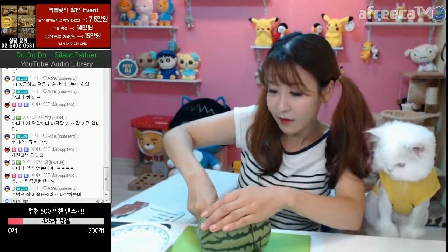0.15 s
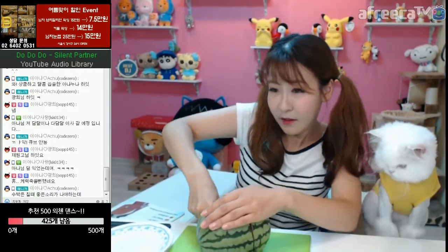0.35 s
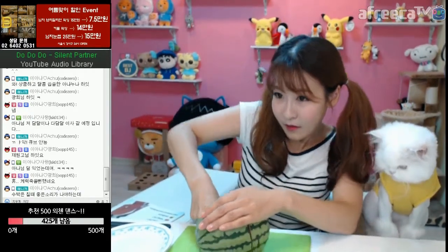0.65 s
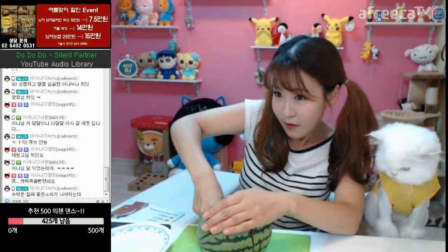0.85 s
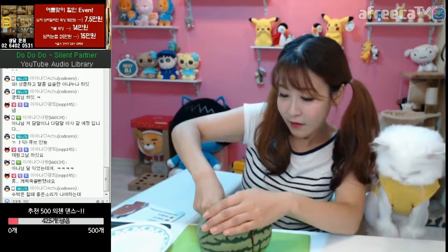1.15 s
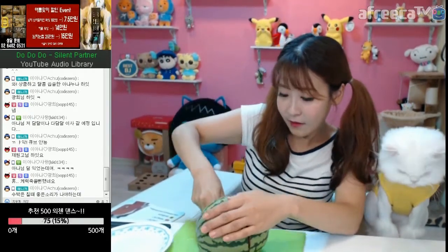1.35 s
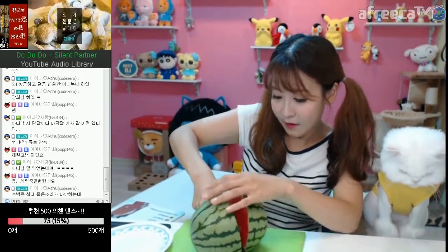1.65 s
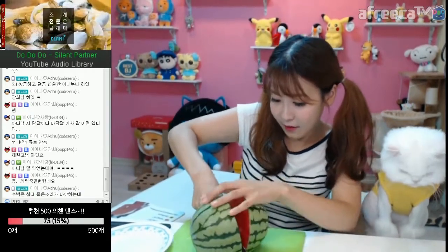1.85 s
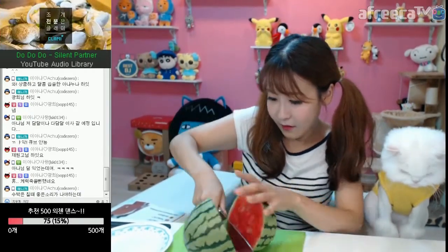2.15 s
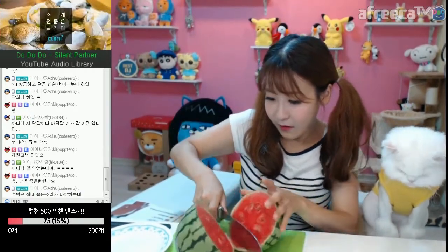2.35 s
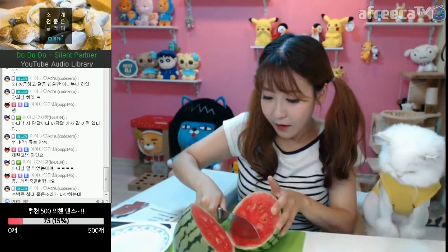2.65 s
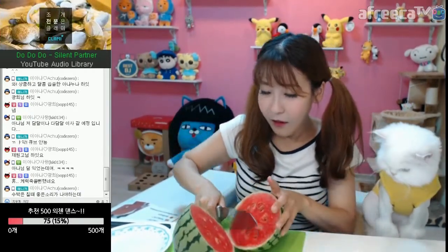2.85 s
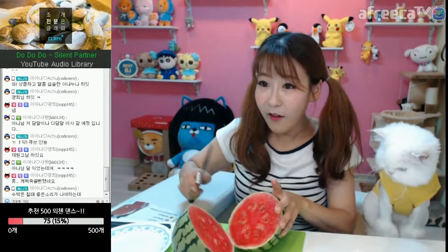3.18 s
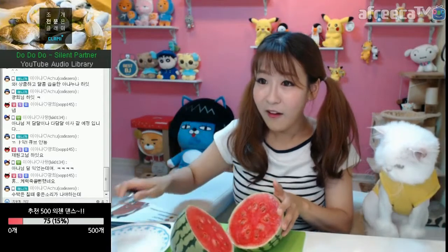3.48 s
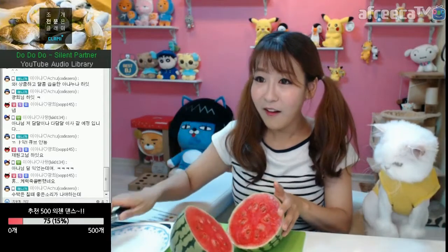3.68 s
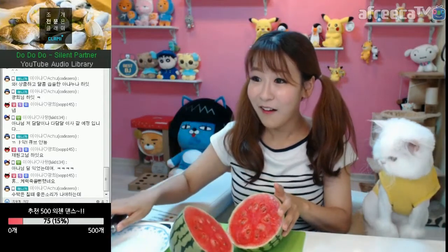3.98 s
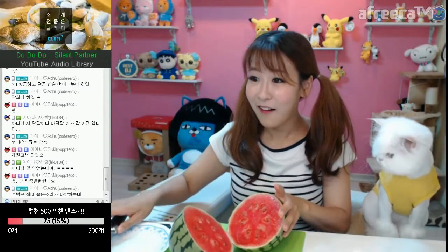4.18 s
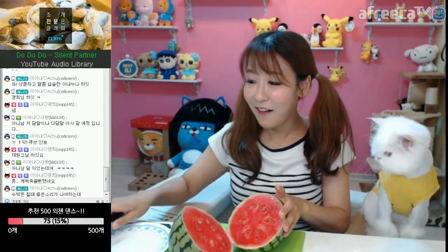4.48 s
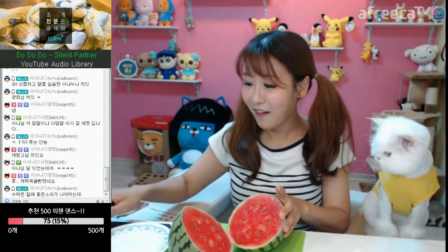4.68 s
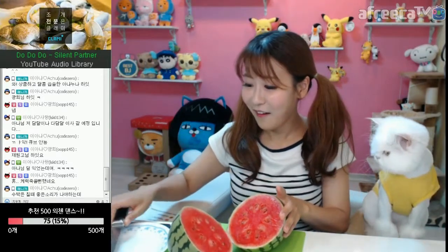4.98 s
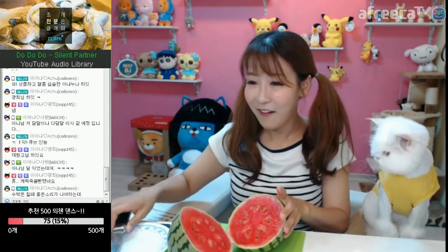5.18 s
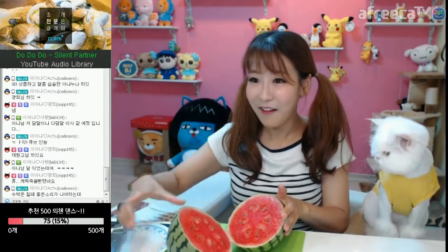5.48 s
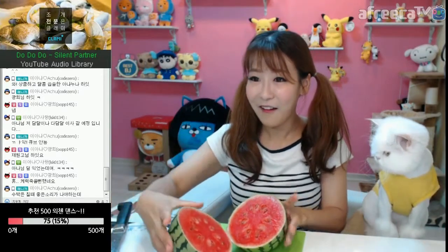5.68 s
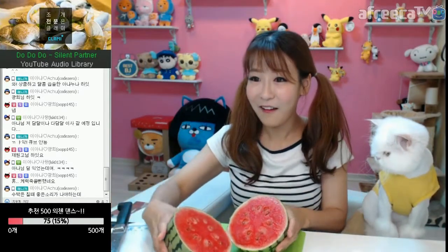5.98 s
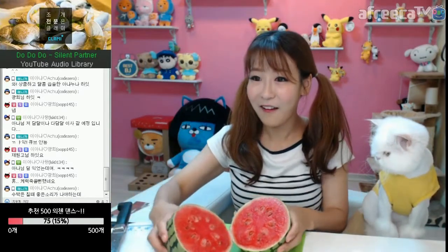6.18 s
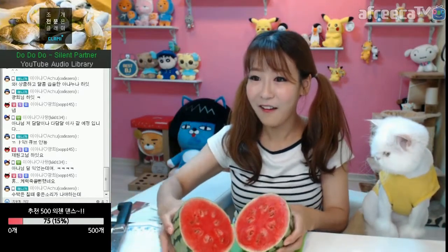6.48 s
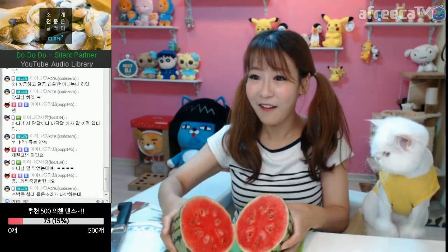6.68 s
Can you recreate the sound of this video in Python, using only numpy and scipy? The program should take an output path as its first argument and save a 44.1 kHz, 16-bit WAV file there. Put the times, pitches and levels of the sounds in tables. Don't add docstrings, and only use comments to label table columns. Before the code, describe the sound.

Nearly mono, close microphone with a short room tail: rapid rind cracks burst into a juicy split, ending in a loud blade thud and a lesser one. Crackly tearing opens the fruit, then near silence over a soft computer fan. Small ceramic taps and a dull handle knock lead to a sharp bouncing metal clatter, soft hand bumps and tiny ticks. Low rumble comes from leaning hands.

```python
import sys
import numpy as np
from scipy import signal
from scipy.io import wavfile

SR = 44100
rng = np.random.default_rng(int(sys.argv[2]) if len(sys.argv) > 2 else 0)


def volts(x):
    e = np.asarray(x, float) / 20
    return 10 ** e


def log_audio(samples):
    frames = np.atleast_2d(samples).T
    limited = np.clip(frames, -1, 1)
    pcm = np.round(limited * 32767).astype(np.int16)
    wavfile.write(sys.argv[1], SR, pcm)


N = 301100
DELAY_S = 0.00083
LEAD = 400

# pitch in Hz, level in dB, time to fall by 60 dB in seconds.
MELON = [(460, 5, 0.035), (580, -3, 0.035), (950, -8, .012), (1220, -5, 0.02), (1750, -10, 0.01),
         (341.6, -15.5, .04)]


def rms_one(x):
    return x / np.sqrt(np.mean(x ** 2) + 1e-20)


def peak_one(x):
    return x / np.abs(x).max()


def band(x, low_hz, high_hz, order=2):
    sos = signal.butter(order, [low_hz, min(high_hz, SR / 2.2)], "band", fs=SR, output="sos")
    return signal.sosfilt(sos, x)


def swell(s, hold_s, rise_db_per_s, fall_db_per_s):
    end = s + hold_s
    times = [s - 90 / rise_db_per_s, s, end, end + 90 / fall_db_per_s]
    db = np.interp(np.arange(0, N, 20) / SR, times, [-90, 0, 0, -90])
    return volts(db).repeat(20)[:N]


def ring(clicks, hz, t60):
    r, w = volts(-60 / (t60 * SR)), 2 * np.pi * hz / SR
    return signal.lfilter([0, np.sin(w)], [1, -2 * r * np.cos(w), r * r], clicks + 1e-18)


def struck(s, db, modes, spread_db):
    out, at = np.zeros(N), np.round(np.asarray(s) * SR).astype(int)
    for hz, mode_db, t60 in modes:
        luck = rng.standard_normal(len(at))
        clicks = np.zeros(N)
        clicks[at] = volts(db + mode_db + spread_db * luck)
        out += ring(clicks, hz, t60)
    return out


def add(out, s, piece):
    i = round((s + DELAY_S) * SR) - LEAD
    out[i:i + len(piece)] += piece[:N - i]


def burst(t60, size=2048, edge_db=0):
    t = (np.arange(size) - LEAD) / SR
    x = rng.standard_normal(size) * volts(np.where(t < 0, -20 + 2200 * t, -60 * t / t60))
    x[LEAD] = -3.0 * volts(edge_db)
    return x


def coloured(white, spectrum, edges, tilt_db=0):
    hz, db = np.transpose(spectrum)
    centres = np.sqrt(edges[1:] * edges[:-1])
    band_db = np.interp(np.log(centres), np.log(hz), db) + tilt_db * np.log2(centres / 1500)
    out = 0
    for k, gain in enumerate(volts(band_db)):
        out = out + gain * band(white[k % len(white)], edges[k], edges[k + 1])
    return out


def rattles(rows, spectrum, edge_db):
    out, edges = np.zeros(N), 180 * 2 ** np.arange(0, 6, 1 / 3)
    for s, db, tilt_db, t60 in rows:
        shudder = burst(max(t60, .01), size=SR // 3, edge_db=edge_db)
        add(out, s, volts(db) * peak_one(coloured([shudder, -shudder], spectrum, edges, tilt_db)))
    return out


def fan():
    # pitch in Hz, level in dB per Hz.
    air_colour = [(24, -36), (40, -18), (70, 4), (174, -19), (204, -9), (235, -6.5), (411, -10.5),
                  (441, -13), (754, -20), (847, -12), (2590, -25), (9570, -37.5), (10500, -40.5),
                  (13600, -78), (22000, -120)]
    # pitch in Hz, width in Hz, level in dB against the air.
    casing = [(445, 22, -10.5), (840, 50, -10), (997, 86, -14), (1213, 12, -19.5)]
    white = rng.standard_normal((3, N))
    out = rms_one(coloured(white[:2], air_colour, 48 * 2 ** np.arange(0, 8.1, .5)))
    for hz, width_hz, db in casing:
        out += volts(db) * rms_one(band(white[2], hz - width_hz / 2, hz + width_hz / 2, order=1))
    return volts(-65) * out


def shake():
    # start in seconds, hold in seconds, sway in dB, rumble in dB.
    pushes = [(0, 0.06, -45.5, -70.5), (0.238, 0.05, -49.5, -79), (0.544, 0.027, -61, -62),
              (0.698, 0.042, -46.5, -55.5), (.9, 0.015, -50, -45.5), (.98, 0.02, -58, -39),
              (1.104, 0.13, -61, -64), (1.373, 0.025, -61, -50), (1.473, 0.035, -70, -63),
              (1.756, 0.09, -63, -62), (2.015, 0.12, -67, -73), (2.514, 0.03, -81, -63),
              (4.64, 0.03, -88, -55.5), (5.36, 0.054, -90, -47), (5.505, .05, -78, -54.5)]
    rest_sway_db, rest_rumble_db = -87, -73
    s, hold_s, sway_db, rumble_db = np.transpose(pushes)
    lean = np.array([swell(*row, rise_db_per_s=300, fall_db_per_s=128.5) for row in zip(s, hold_s)])
    sway, rumble = rng.standard_normal((2, N))
    sway_gain = volts(rest_sway_db) + volts(sway_db) @ lean
    rumble_gain = volts(rest_rumble_db) + volts(rumble_db - 11.5) @ lean
    return sway_gain * rms_one(band(sway, 6, 15)) + rumble_gain * rms_one(band(rumble, 50, 180))


def booms():
    # start in seconds, deepest pitch in dB, upper pitches in dB.
    blows = [
        (0.579, -61, -42),
        (.64, -39, -63),
        (0.929, -54, -47),
        (1.028, -40.5, -37),
        (1.079, -41.5, -73),
        (1.356, -60, -45),
        (5.35, -39.5, -38.5),
        (5.549, -74, -55),
    ]
    # pitch in Hz, time to fall by 60 dB in seconds.
    table_top = [(89, 0.11), (135, 0.066), (210, 0.077)]
    s, deep_db, upper_db = np.transpose(blows)
    out = np.zeros(N)
    for (hz, t60), db in zip(table_top, [deep_db, upper_db, upper_db]):
        out += struck(s, db, [(hz, 0, t60)], spread_db=0)
    return band(out, 71, 220)


def plate():
    # start in seconds, peak in dB, nearness to the rim from 0 to 1.
    taps = [
        (4.037, -57.5, 0.95),
        (4.409, -42, 0),
        (4.589, -63, 1),
        (5.29, -50.5, 0.8),
    ]
    # pitch in Hz, dB struck inside, dB struck at the rim, time to fall by 60 dB in seconds.
    modes = [(797, 6, -30, .09), (1500, -3, -30, .06), (2223, -1, -12, .2), (3128, -4, -5, .15),
             (4258, 1, -2, .13), (5600, -20, -1, .07), (7090, -16, -2, .06), (8800, -26, -9, .06)]
    # start in seconds, level in dB, pitch in Hz,
    # time to fall by 60 dB in seconds.
    dish = (4.662, -73, 4690, .35)
    out, click = np.zeros(N), np.arange(SR // 3) == LEAD
    for s, db, rim in taps:
        body = 0
        for hz, inside_db, rim_db, t60 in modes:
            body = body + volts(inside_db + rim * (rim_db - inside_db)) * ring(click, hz, t60)
        add(out, s, volts(db) * peak_one(body))
    s, db, hz, t60 = dish
    return out + struck([s], db, [(hz, 0, t60), (1.012 * hz, -3, t60)], spread_db=0)


def handle_knocks():
    # start in seconds, peak in dB, tilt in dB per octave, rattle's 60 dB fall in seconds.
    knocks = [
        (4.408, -45, 0, 0.071),
        (4.635, -36, 0.012, 0.062),
        (4.655, -45, 0, 0.031),
    ]
    # pitch in Hz, level in dB per Hz.
    handle = [(240, -26), (400, -7), (680, 3), (1040, -5), (2160, 1.5), (2340, -4), (3290, -11.5),
              (7230, -16.5), (9750, -26), (10300, -48), (13400, -78), (22000, -120)]
    return rattles(knocks, handle, edge_db=1.0)


def dropped_knife():
    # start in seconds, peak in dB, tilt in dB per octave, rattle's 60 dB fall in seconds.
    landings = [
        (5.3462, -14, -0.5, 0.058),
        (5.352, -17, -4, 0.032),
        (5.359, -14, 3, 0.013),
        (5.365, -23, -1.5, 0.027),
        (5.375, -27.5, 0.5, 0.18),
    ]
    # pitch in Hz, level in dB per Hz.
    clatter = [(120, -30), (200, -15), (638, -35), (791, -25.5), (904, -35.5), (1250, -3.5), (1600, -16),
               (2040, 2.5), (2700, -31.5), (3080, 2), (5150, 0), (7170, 0.5), (8200, -5), (9050, 0),
               (10500, -37), (13600, -67), (22000, -120)]
    # pitch in Hz, level in dB, time to fall by 60 dB in seconds.
    steel = [(800, -8, .12), (1992, -1, .09), (2128, -12, .07), (3090, -6, .07), (3628, -2, .05),
             (3910, -10, .05), (6045, -2, .05), (6360, -2, .06), (6937, -6, .07), (7035, -3, .09),
             (7110, -5, .07), (7240, -7, .07), (7840, -4, .09), (8349, -8, .2), (8775, -8, .1)]
    rows = np.array(landings)
    blade = struck(rows[:, 0] + DELAY_S, rows[:, 1] - 16.5, steel, spread_db=1.5)
    return rattles(landings, clatter, edge_db=-2) + band(blade, 600, 11000)


def thuds():
    # start in seconds, peak in dB, tilt in dB per octave, rattle's 60 dB fall in seconds.
    blows = [
        (1.0255, -15, 2.5, 0.034),
        (1.032, -32, 1, 0.084),
        (1.049, -28, 0.5, 0.088),
        (1.074, -52, 0.3, 0.099),
        (1.3535, -26.5, -0.5, 0.055),
        (1.376, -41, -1, 0.11),
        (5.547, -54.5, -7, 0.094),
        (5.612, -53, -14, 0.12),
    ]
    # pitch in Hz, level in dB per Hz.
    board = [(150, -34), (250, 3.5), (420, 16.5), (620, 7.5), (900, 13.5), (1200, 11), (2000, 4),
             (3200, -1), (4500, -7), (6000, -23.5), (8000, -30.5), (11000, -40)]
    return rattles(blows, board, edge_db=9.0)


def tearing():
    # start in seconds, hold in seconds, level in dB, centre in Hz,
    # hollow body in dB against the level.
    tears = [(0, 0.021, -63.5, 4330, -26), (0.055, .2, -70, 5000, -19), (0.264, 0.16, -62.5, 4800, -11),
             (0.412, 0.071, -43.5, 5000, -11), (0.514, 0.037, -52.5, 4500, -15),
             (0.568, 0.0067, -28.5, 4260, -12), (0.592, 0.015, -29, 4500, -16.5),
             (0.665, 0.063, -49, 4870, -16), (0.773, 0.12, -50, 5360, -14.5),
             (0.858, 0.081, -63, 5300, 1.5), (0.927, 0.022, -54.5, 5300, -2.5),
             (0.966, 0.02, -47, 5400, -14), (1.397, .17, -60.5, 3430, -26),
             (1.793, 0.044, -48.5, 5000, -35), (1.954, .015, -60.5, 5300, -22),
             (2.143, 0.078, -66, 4700, -19), (2.3, 0.1, -51, 5500, -13), (2.383, .02, -41, 5600, -17.5),
             (2.449, 0.065, -50, 5500, -19), (2.54, 0.057, -62, 5470, -23), (2.607, 0.14, -68.5, 5600, -12),
             (2.77, 0.15, -78, 4700, -9.5)]
    present = rng.random(N) < 5000 / SR
    grain_size = volts(3.1 * np.minimum(rng.exponential(1, N), 5))
    grains = present * grain_size * rng.choice([-1, 1], N)
    centres = np.geomspace(2000, 9000, 7)
    parts = np.array([rms_one(band(grains, hz / 1.16, hz * 1.16)) for hz in centres])
    hollow = rms_one(sum(volts(db) * ring(grains, hz, 0.6 * t60) for hz, db, t60 in MELON))
    out = np.zeros(N)
    for s, hold_s, db, centre_hz, hollow_db in tears:
        shares = volts(-7.0 * np.log2(centres / centre_hz) ** 2)
        flesh = shares @ parts / np.sqrt(np.sum(shares ** 2)) + volts(hollow_db) * hollow
        out += volts(db) * swell(s, hold_s, rise_db_per_s=1303, fall_db_per_s=381) * flesh
    return out


def snaps():
    # start in
    # seconds, peak in dB, centre in Hz, hollow body in dB against the peak.
    breaks = [(0.405, -24, 5420, -23), (0.4219, -29, 4960, -23), (0.4339, -26, 5440, -24),
              (0.4424, -29, 4310, -21), (0.4539, -25, 5540, -24), (0.4648, -23, 4800, -24),
              (0.5142, -41, 2540, -19), (0.5412, -37, 4880, -8), (0.5556, -24, 3830, -18),
              (0.5634, -28, 3160, -8), (0.5706, -17, 3190, -14), (0.5906, -20, 5050, -14),
              (0.5999, -20, 3770, -15), (0.6044, -20, 4730, -15), (0.6104, -21, 5520, -22),
              (0.6874, -37, 5070, -20), (0.7706, -46, 5500, -22), (0.825, -42, 5820, -8),
              (0.846, -16, 4700, -27), (0.9093, -21, 5400, -22), (0.9744, -43, 5060, -18),
              (1.1799, -51, 2760, -10),
              (1.3764, -47, 2590, 6), (1.3944, -49, 2850, 1), (1.7823, -44, 3940, -17),
             (1.8347, -37, 5570, -22), (1.8542, -24, 5420, -35), (1.8946, -45, 4620, -20),
             (1.9599, -46, 4470, -18), (1.9714, -37, 4780, -27), (1.9769, -33, 5410, -31),
             (2.0063, -43, 7230, -22), (2.1314, -58, 3980, -7), (2.166, -52, 4640, -14),
             (2.1999, -58, 4610, -7), (2.2847, -25, 5000, -15), (2.3241, -25, 5400, -19),
             (2.3575, -26, 5540, -18), (2.3835, -20, 5000, -22), (2.4514, -45, 3930, -16),
             (2.4728, -25, 6200, -23), (2.4974, -39, 4620, -21), (2.5411, -41, 5040, -23),
             (2.6074, -57, 1600, -4), (2.6579, -54, 7400, -12), (2.7003, -55, 4570, -15)]
    late = [
        (3.1094, -63, 5140, -27.5),
        (5.707, -61.5, 5170, -21),
        (5.915, -56, 5720, -25),
        (6.09, -58.5, 7260, -29),
        (6.294, -58.5, 5780, -24),
    ]
    # pitch in Hz, level in dB, time to fall by 60 dB in seconds.
    halves = [(580, 2, 0.027), (990, 1.5, 0.01), (1230, 3.5, 0.02), (1560, -3, .012), (2320, -1, 0.023),
              (3150, -1, 0.025)]
    # delay in seconds, level in dB.
    echoes = [(.0015, -13.5), (.0040, -15.5), (.0092, -13)]
    opens_s, click_db, hollow_db = 2.2, 1.0, -4.5
    rows, out = np.array(breaks + late), np.zeros(N)
    for s, db, hz, _ in rows:
        splinters = burst(.006, edge_db=1.5)
        click = peak_one(band(splinters, 0.79 * hz, 1.31 * hz, order=1))
        add(out, s, volts(db + click_db) * click)
    knock_db = rows[:, 1] + np.minimum(rows[:, 3], -12) + hollow_db
    whole = rows[:, 0] < opens_s
    for body, chosen in [(MELON, whole), (halves, ~whole)]:
        out += struck(rows[chosen, 0] + DELAY_S, knock_db[chosen], body, spread_db=2)
    return out + sum(volts(db) * np.roll(out, round(s * SR)) for s, db in echoes)


def room(near, far, near_db):
    # pitch in Hz, time to fall by 60 dB in seconds, level in dB against the direct sound.
    tail_bands = [(300, 0.21, -17), (1060, 0.34, -4.5), (3006, .3, -7), (7000, 0.29, -7.5)]
    t, late = np.arange(SR // 2) / SR, 0
    for hz, t60, db in tail_bands:
        noise = band(rng.standard_normal(len(t)), hz / 1.8, hz * 1.8, order=1)
        tail = noise * volts(-60 * t / t60) * (1 - np.exp(-t / 0.0017))
        late = late + volts(db) * tail / np.sqrt(np.sum(tail ** 2)) * np.sqrt(hz / 16000)
    return near + far + signal.fftconvolve(volts(near_db) * near + far, late)[:N]


def difference(mid):
    # low edge in Hz, high edge in Hz, level in dB.
    noise_bands = [(200, 1500, -99), (1477, 4200, -89.5), (3000, 5700, -90.5), (5000, 10000, -93.5),
                   (7200, 13000, -102)]
    out = volts(-33) * mid * rms_one(band(rng.standard_normal(N), 20, 150))
    for low_hz, high_hz, db in noise_bands:
        patches = rms_one(band(rng.standard_normal(N), 1.5, 5, order=1)) > -.3
        out += volts(db) * patches * rms_one(band(rng.standard_normal(N), low_hz, high_hz))
    return out


def scene():
    melon = snaps() + tearing()
    table = thuds() + handle_knocks() + plate() + dropped_knife()
    mid = room(melon, table, near_db=-5) + booms() + shake() + fan()
    side = difference(mid)
    return np.array([mid + side, mid - side])


def band_limit(x):
    return signal.sosfilt(signal.butter(12, 10680, fs=SR, output="sos"), x)


def record(dry):
    top_cut = signal.cheby2(10, 60, 11220, fs=SR, output="sos")
    return band_limit(signal.sosfilt(top_cut, dry))


dry = scene()
out = record(dry)
log_audio(out)
```